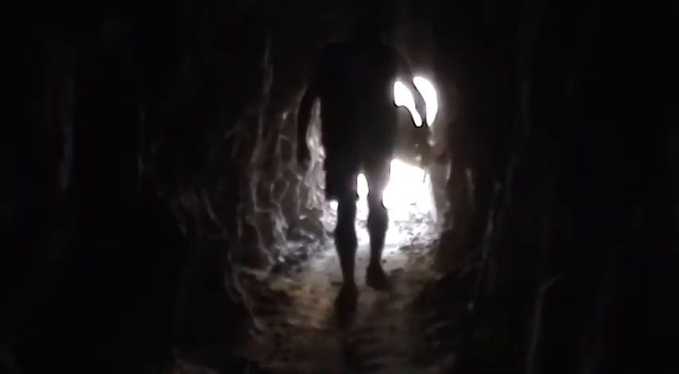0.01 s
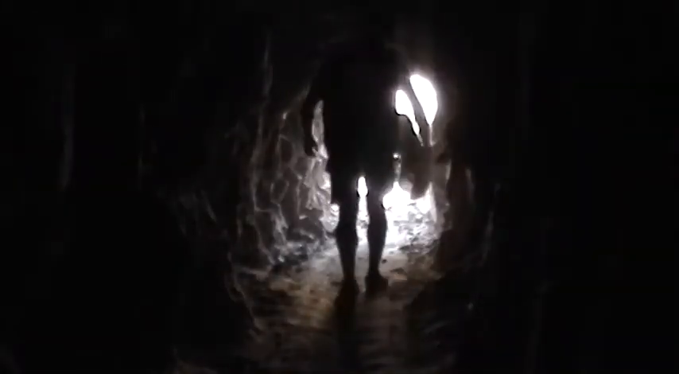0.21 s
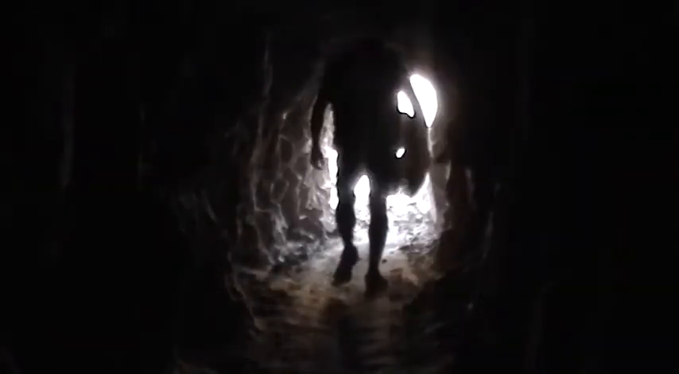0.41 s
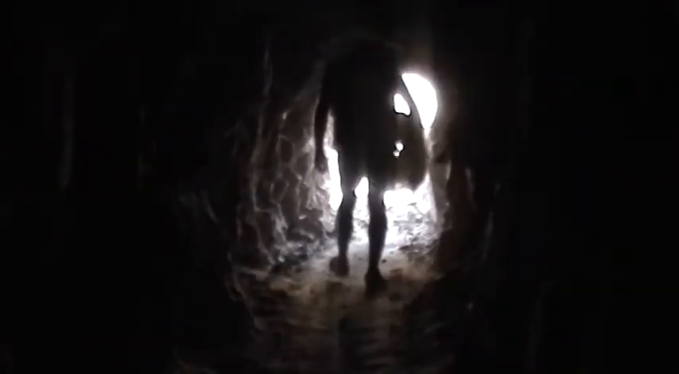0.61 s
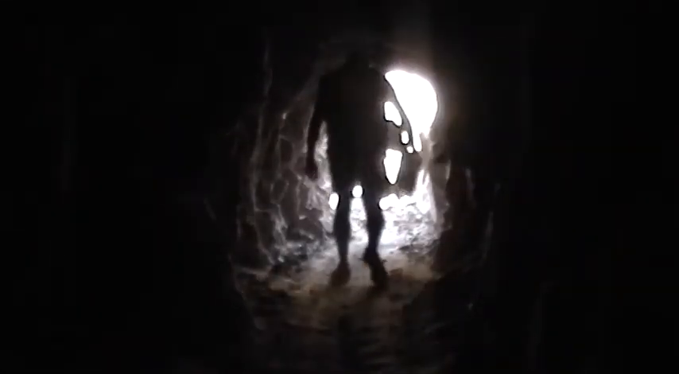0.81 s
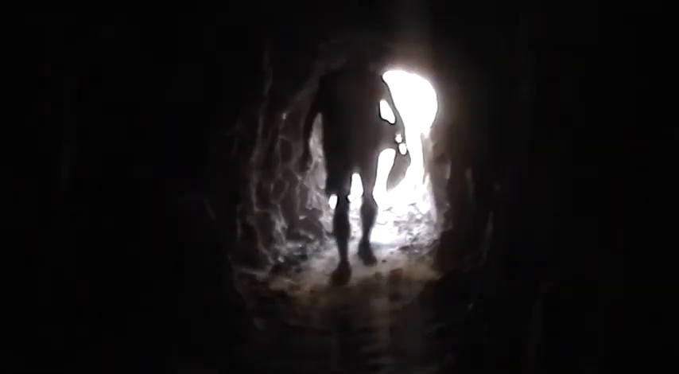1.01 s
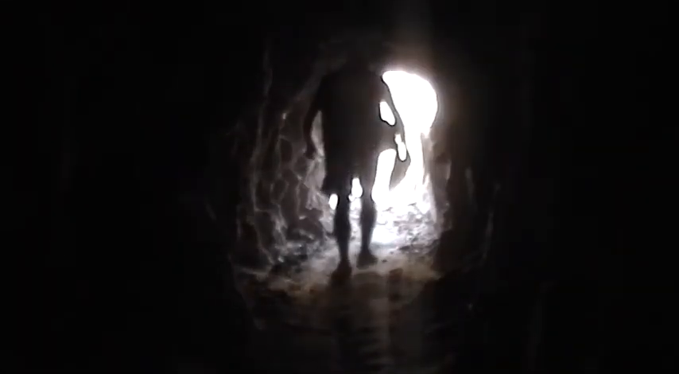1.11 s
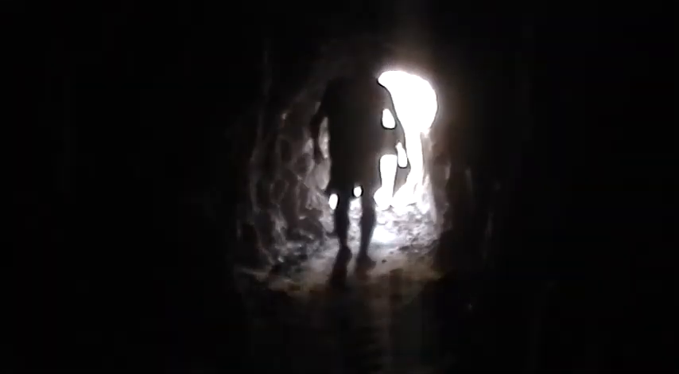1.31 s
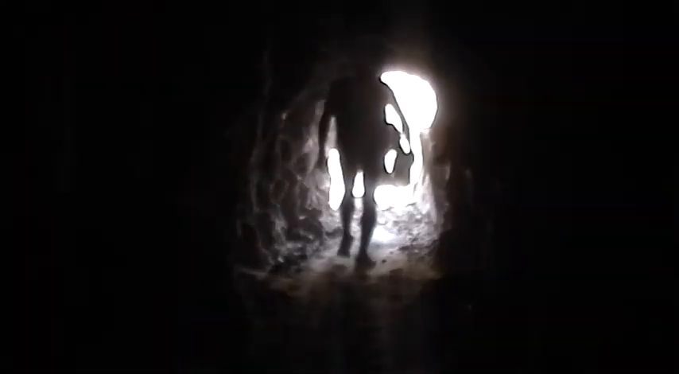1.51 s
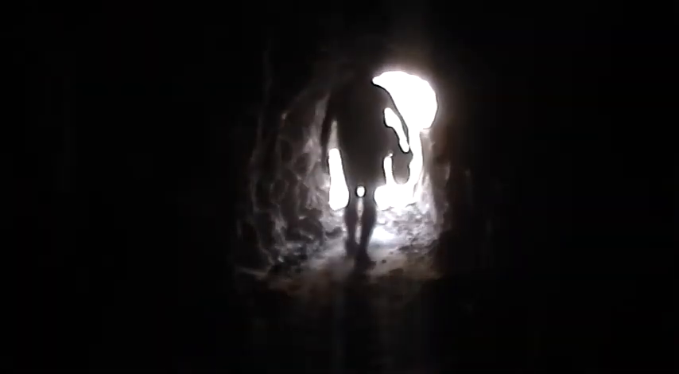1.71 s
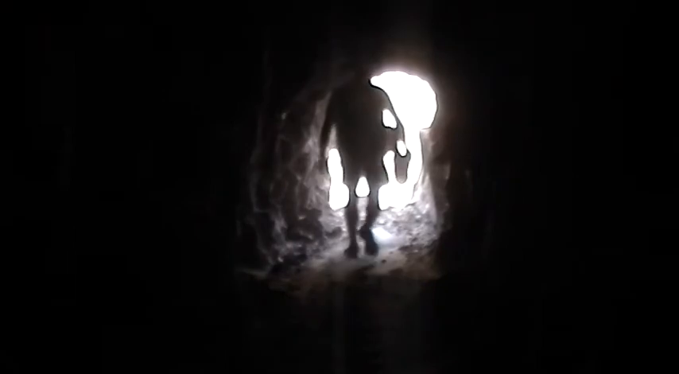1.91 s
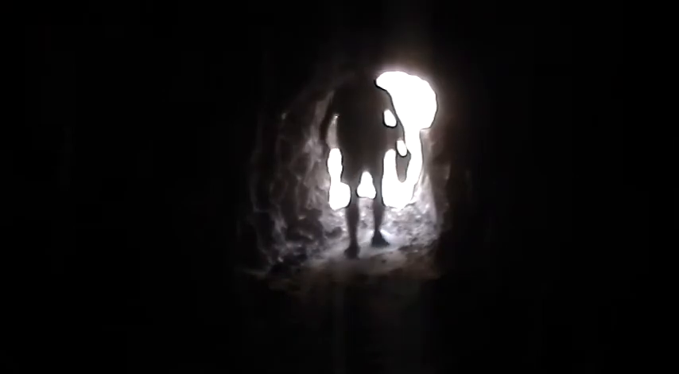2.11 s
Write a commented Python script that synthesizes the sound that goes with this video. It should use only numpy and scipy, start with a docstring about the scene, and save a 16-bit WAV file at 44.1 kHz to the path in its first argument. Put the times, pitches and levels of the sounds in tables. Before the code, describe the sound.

Footsteps crunch away over a gritty rock floor in an echoing tunnel.

```python
"""A narrow mine tunnel with a gritty rock floor: someone walks away, four steps.
Heel and sole knock on the rock, grit crunches, the sole sticks and slips, small stones click, and
there is one faint short squeak. A small metal thing is tapped and clinks, then jingles.
The rock walls ring after every sound, over a faint rumble of air and a thin hiss."""
import sys
import numpy as np
from scipy import signal
from scipy.fft import rfft, irfft
from scipy.io import wavfile
from scipy.ndimage import uniform_filter1d

SR = 44100
rng = np.random.default_rng(int(sys.argv[2]) if len(sys.argv) > 2 else 0)


def to_wav(s):
    """Save 16-bit WAV."""
    ch = np.atleast_2d(s).T  # columns
    pcm = np.round(np.clip(ch, -1, 1) * 32767)  # PCM
    wavfile.write(sys.argv[1], SR, pcm.astype(np.int16))


N = 97020
LEAD_S = .3  # the walk is under way before t = 0
M = N + int(LEAD_S * SR)
T = np.arange(M) / SR - LEAD_S
FFT_SIZE = 2 ** 17
FREQS_HZ = np.maximum(np.arange(FFT_SIZE // 2 + 1) * SR / FFT_SIZE, 1)
LEFT_RIGHT = np.array([[1], [-1]])


def amp(db):
    """Decibels to gain."""
    return 10 ** (np.asarray(db) / 20)


def unit(x):
    """Scale to unit energy."""
    return x / np.sqrt(np.sum(x ** 2) + 1e-30)


def curve(points, hz=FREQS_HZ):
    """Interpolate a table over log frequency."""
    points_hz, values = np.array(points, float).T
    return np.interp(np.log(hz), np.log(points_hz), values)


def response(db, size=4096):
    """Minimum-phase, unit-energy impulse response of a spectrum."""
    cepstrum = irfft(np.log(amp(db)))
    cepstrum[1:FFT_SIZE // 2] *= 2
    cepstrum[FFT_SIZE // 2 + 1:] = 0
    return unit(irfft(np.exp(rfft(cepstrum)))[:size])


def shelves(bass_db, treble_db, bass_hz=188, treble_hz=1710):
    """Shelf curve in dB: bass for weight, treble for hardness of contact."""
    return bass_db / (1 + (FREQS_HZ / bass_hz) ** 4) + treble_db / (1 + (treble_hz / FREQS_HZ) ** 2)


def flatten(x, width_hz=150):
    """Level a burst's broad spectral peaks and dips; keep its fine grain and energy."""
    power = abs(rfft(x, 2 * len(x))) ** 2
    power = uniform_filter1d(power, max(int(width_hz * 2 * len(x) / SR), 3))
    inverse_db = -10 * np.log10(np.maximum(power, 1e-9))
    inverse = response(np.interp(FREQS_HZ, np.linspace(0, SR / 2, len(power)), inverse_db))
    return unit(signal.fftconvolve(x, inverse)[:len(x)]) * np.sqrt(np.sum(x ** 2))


def place(x, start_s, db, rms_window_s=.05):
    """Put a unit-energy blow at start_s; db is its energy as rms over the window."""
    delay = max(int((start_s + LEAD_S) * SR), 0)
    return np.pad(x, (delay, M))[:M] * amp(db) * np.sqrt(rms_window_s * SR)


def tick(hz, octaves=.35, size=SR):
    """Short click centred on one pitch."""
    return response(-20 * np.log10(1 + (np.log2(FREQS_HZ / hz) / octaves) ** 2), size)


def ring(modes, t60_scale=1, count=SR):
    """Decaying sines in random phase from rows of f/Hz, level/dB, t60/s."""
    out, t = 0, np.arange(count) / SR
    for hz, db, t60_s in modes:
        decay = np.exp(-np.log(1000) * t / (t60_s * t60_scale))
        out = out + amp(db) * np.sin(2 * np.pi * (hz * t + rng.random())) * decay
    return unit(out)


def contact(settle_s, settle_db, count=4096):
    """Contact force: one impulse, then brief chatter as it settles."""
    t = np.arange(count) / SR
    force = amp(settle_db) * unit(rng.standard_normal(count) * np.exp(-t / settle_s))
    force[0] += 1
    return flatten(force)


def knocks(settle_s=.0049, slap_t60_s=.054, slap_send_db=-11.5, count=4096):
    """Heel or sole strikes rock and settles; its pitched slap arrives mostly direct."""
    # shoe strikes: t/s, level/dB, bass/dB, treble/dB, slap f/Hz, slap re knock/dB
    strikes = [(-.16, -33, -1, 16, 334, -11), (.210, -43, 2, -0.5, 1944, -6.5),
               (.373, -31.5, -10.5, -7, 951, -4.5), (.811, -44.5, 10, 19.5, 2266, -8),
               (.872, -46, 18, -2, 875, -5), (.975, -40, 7, -8, 782, -6.5), (1.335, -42.5, 8.5, 5, 935, -7),
               (1.418, -35.5, -8.5, 4.5, 900, -16.5), (1.794, -43, 14.5, 1.5, 471, -5)]
    # knock spectrum: f/Hz, level/dB
    spectrum = [(30, -48.5), (100, -13.5), (160, -6), (235, -7), (400, 2), (600, 1.5), (980, -0.5),
                (1400, -5), (2500, -10.5), (4200, -15), (6000, -24.5), (10000, -29.5), (16000, -46)]
    # sole resonances: ratio to slap f, level/dB
    sole_modes = [(0.82, -5.5), (1, 5), (1.101, 0)]
    swell = 1 - np.exp(-np.arange(count) / SR / settle_s)
    out = 0
    for start_s, db, bass_db, treble_db, slap_hz, slap_db in strikes:
        force = contact(settle_s, settle_db=.5)
        body = response(curve(spectrum) + shelves(bass_db, treble_db))
        knock = place(unit(signal.fftconvolve(force, body)), start_s, db)
        modes = [(ratio * slap_hz, mode_db, slap_t60_s) for ratio, mode_db in sole_modes]
        slap = place(unit(ring(modes, count=count) * swell), start_s, db + slap_db)
        out = out + slap + tunnel(knock + amp(slap_send_db) * slap)
    return out


def grit(grains_per_s=2400, spread_db=8, rub_db=-4):
    """Grains crack and slide under the foot; each crunch swells and fades."""
    # crunches: t/s, rise/s, fade/s, level/dB, bass/dB, treble/dB, upper edge/Hz
    crunches = [(0.213, 0.0042, 0.0076, -39.5, 0, 6, 14000), (0.23, 0.015, 0.018, -22.5, 6, -1, 10200),
                (0.258, 0.0144, 0.0088, -29, 8, -4.5, 9500), (.345, 0.023, 0.039, -45.5, -6, 27, 10000),
                (.54, 0.01, 0.37, -54.5, -5, -11, 8330), (0.781, 0.056, 0.043, -39, 23.5, -2.5, 12200),
                (0.847, 0.028, 0.028, -41, 5, 2.5, 16000), (1.099, .002, 0.022, -41.5, -2, 16, 7650),
                (1.118, 0.029, 0.013, -43, 21, 13, 5470), (1.273, 0.007, 0.17, -51.5, -20, -3, 8300),
                (1.321, 0.016, 0.051, -35.5, 7.5, 0, 11000), (1.391, 0.023, 0.023, -40.5, 11.5, 0, 9360),
                (1.789, 0.028, 0.047, -38, 8.5, -6.5, 11100), (1.845, 0.0091, 0.065, -47.5, -6, 9, 11200),
                (1.895, 0.0063, 0.036, -38, -7, 5, 8500)]
    # grit spectrum: f/Hz, level/dB
    spectrum = [(30, -48), (100, -21), (170, -16), (240, -7.5), (400, 0.5), (750, 2), (1300, -2.5),
                (2000, -4), (2700, -5), (4200, -8.5), (6000, -16), (10000, -22), (16000, -27.5)]
    out = 0
    for start_s, rise_s, fade_s, db, bass_db, treble_db, edge_hz in crunches:
        age_s = T - start_s
        pressure = np.clip(age_s / rise_s, 0, 1) * np.exp(-np.maximum(age_s - rise_s, 0) / fade_s)
        sizes = amp(spread_db * np.minimum(rng.exponential(size=M), 4))
        cracks = unit((rng.random(M) < grains_per_s / SR) * sizes * rng.choice([-1, 1], M))
        rub = amp(rub_db) * unit(rng.standard_normal(M))
        crunch = unit(cracks + rub) * np.sqrt(M) * pressure
        rolloff_db = 10 * np.log10(1 + (FREQS_HZ / edge_hz) ** 6)
        colour = response(curve(spectrum) + shelves(bass_db, treble_db) - rolloff_db)
        out = out + amp(db) * signal.fftconvolve(crunch, colour)[:M]
    return tunnel(out)


def scrapes(slips_per_s=640, spread_db=4):
    """The sole sticks and slips; each slip rings it briefly, giving a narrow rasp."""
    # drags over rock: t/s, length/s, level/dB, f/Hz
    drags = [(0.231, 0.042, -34.5, 1930), (1.12, 0.039, -51, 1770), (1.727, 0.019, -54.5, 1840),
             (1.913, 0.0096, -45, 2030), (1.949, .018, -47, 1620)]
    out = 0
    for start_s, length_s, db, hz in drags:
        slips = (rng.random(M) < slips_per_s / SR) * amp(spread_db * rng.standard_normal(M))
        envelope = np.sin(np.pi * np.clip((T - start_s) / length_s, 0, 1)) ** .5
        sole = tick(hz, octaves=.24, size=2048)
        rasp = unit(signal.fftconvolve(slips * envelope, sole)[:M])
        out = out + amp(db) * rasp * np.sqrt(length_s * SR)
    return tunnel(out)


def booms(t60_s=.49, build_s=.0041):
    """A footfall wakes one cross resonance of the tunnel, depending on the spot."""
    # woken resonances: t/s, level/dB, f/Hz
    resonances = [(.375, -45, 615), (1.42, -42.5, 387), (1.796, -48, 513.4)]
    swell = 1 - np.exp(-np.arange(SR) / SR / build_s)
    return sum(place(unit(ring([(hz, 0, t60_s)]) * swell), start_s, db) for start_s, db, hz in resonances)


def pebbles_and_squeak():
    """Small stone clicks on the floor, and one faint short squeak at 0.707 s."""
    # clicks and the squeak: t/s, level/dB, f/Hz
    events = [(.374, -43, 4080), (.583, -73, 10050), (.707, -67, 3200), (0.886, -63, 11400),
              (.975, -63, 14000), (1.101, -59, 5000), (1.419, -47, 3060), (1.443, -52.5, 2740)]
    return tunnel(sum(place(tick(hz), start_s, db) for start_s, db, hz in events))


def metal_ring(t60_scale, t60_cycles=2500, detune=.002, spread_db=4):
    """Touched metal chatters and rings; each touch shifts the modes and favours different ones."""
    # metal modes: f/Hz, level/dB
    metal_modes = [(7460, 0), (8096, -3), (8301, -7), (8900, -7), (9491, -1), (9792, 0), (10449, -7),
                   (10960, 3), (11640, -5), (12279, -3), (13566, -9), (13954, -5), (14578, -5), (15580, -6)]
    force = contact(settle_s=.012, settle_db=-2)
    modes = []
    for hz, db in metal_modes:
        shifted_hz = hz * (1 + detune * rng.standard_normal())
        modes.append((shifted_hz, db + spread_db * rng.standard_normal(), t60_cycles / hz))
    return unit(signal.fftconvolve(force, ring(modes, t60_scale)))


def clinks(tick_hz=8400, side_db=-5, send_db=-3):
    """A small metal thing, perhaps a buckle, ticks and rings at each tap, damped by the grip."""
    # taps: t/s, ring level/dB, share of t60 left by the grip/0-1, tick level/dB
    taps = [(1.813, -59, .35, -51.5), (1.885, -58, .45, -58), (1.895, -57, .7, -66),
            (1.911, -60.5, .45, -60)]
    mid = side = ticks = 0
    for start_s, db, t60_scale, tick_db in taps:
        mid = mid + place(metal_ring(t60_scale), start_s, db)
        side = side + place(metal_ring(t60_scale), start_s, db + side_db)
        ticks = ticks + place(tick(tick_hz), start_s, tick_db)
    return mid + LEFT_RIGHT * side + tunnel(ticks + amp(send_db) * mid)


def echoes(early_db=-2.5, early_s=.015, late_db=-3, build_s=.00057):
    """Dense reflections: a burst from the near walls, then a tail whose treble dies first."""
    # tunnel decay: f/Hz, t60/s
    decay_times = [(100, 1.13), (300, 0.9), (700, 0.56), (1800, 0.4462), (4800, 0.28), (12000, 0.28)]
    t, hz = np.arange(SR) / SR, np.maximum(np.arange(SR // 2 + 1), 1)
    noise = rfft(rng.standard_normal(SR))
    octave, tail = np.clip(np.log2(hz), 6, 14), 0
    for centre in range(6, 15):  # octave bands, 64 to 16384 Hz
        band = irfft(noise * np.maximum(1 - abs(octave - centre), 0), SR)
        tail = tail + band * np.exp(-np.log(1000) * t / curve(decay_times, 2. ** centre))
    early = rng.standard_normal(SR) * np.exp(-(t / early_s) ** 2)
    late = tail * (1 - np.exp(-t / build_s))
    return amp(early_db) * unit(early) + amp(late_db) * unit(late)


def tunnel(x, direct_db=-12, modes_db=-18):
    """Stereo path from one spot on the floor: direct sound, echoes, cross resonances."""
    # cross resonances: f/Hz, level/dB, t60/s
    cross_modes = [(124, -10, 1.1), (239, 0, .9), (322, -1, .7), (387, -3, .6), (615, 0, .7), (770, -2, .6),
                   (945, -3, .5), (1189, -1, .45), (1948, 0, .45), (2090, 2, .45)]
    # left-right difference of the echoes: f/Hz, level/dB
    side_spectrum = [(60, -18), (150, -7), (350, -13), (1300, -8.5), (2800, -11.5), (7000, -32.5),
                     (12000, -13.5)]
    mid = echoes()
    mid[0] += amp(direct_db)
    mid = flatten(mid) + amp(modes_db) * ring(cross_modes)
    side = irfft(rfft(echoes(), FFT_SIZE) * amp(curve(side_spectrum)))[:len(mid)]
    return signal.fftconvolve(x[None], mid + LEFT_RIGHT * side, axes=1)[:, :M]


def air(level_db=-57.5, waver_db=2.94):
    """Faint wavering rumble of tunnel air with a thin hiss on top."""
    # air spectrum: f/Hz, level/dB
    spectrum = [(25, -11), (55, -10), (100, -1), (170, -3), (380, 1), (800, -6), (1500, -10.5),
                (3500, -13.5), (6400, -21), (7300, -12.5), (8200, -22), (12000, -22), (16000, -27.5)]
    # left-right difference of the air: f/Hz, level re mid/dB
    side_spectrum = [(40, 1), (150, 10.5), (500, 0.5), (3000, -11), (8000, -38), (14000, -9)]
    mid_db = curve(spectrum)
    side_db = mid_db + curve(side_spectrum)
    mid, side = (irfft(rfft(rng.standard_normal(FFT_SIZE)) * amp(db))[:M] for db in (mid_db, side_db))
    waver = np.interp(T, np.linspace(T[0], T[-1], 20), rng.standard_normal(20))
    return (mid + LEFT_RIGHT * side) / np.std(mid) * amp(level_db + waver_db * waver)


def scene():
    """The walk over the tunnel air, lead-in dropped."""
    return (knocks() + grit() + scrapes() + booms() + pebbles_and_squeak() + clinks() + air())[:, -N:]


def record(dry):
    """Steep low-pass at 15.7 kHz."""
    return signal.sosfilt(signal.ellip(10, .2, 70, 15700, fs=SR, output="sos"), dry)


dry = scene()
out = record(dry)
to_wav(out)
```